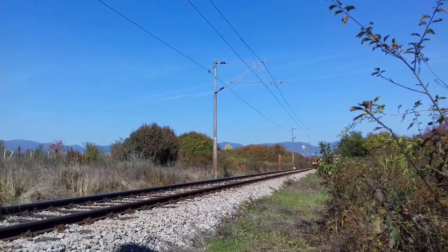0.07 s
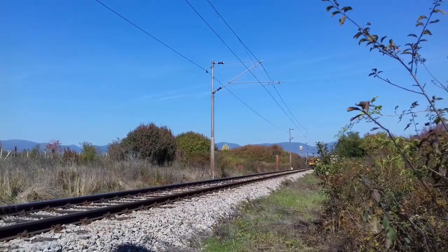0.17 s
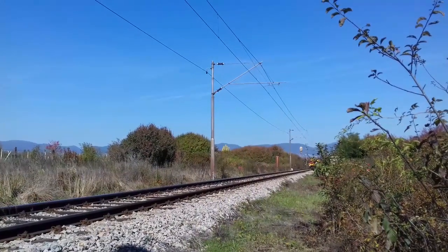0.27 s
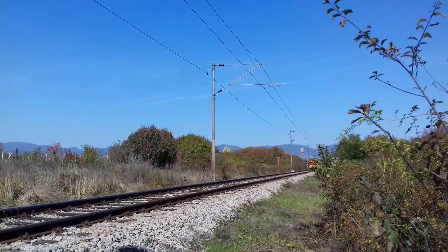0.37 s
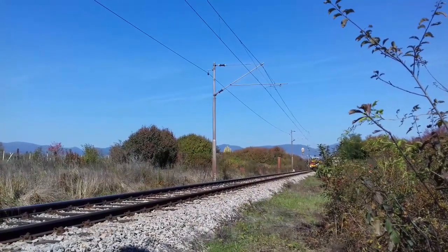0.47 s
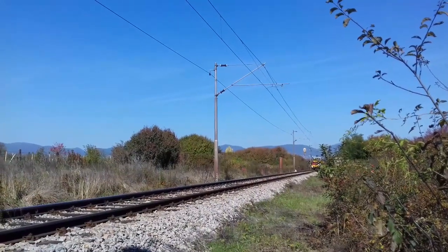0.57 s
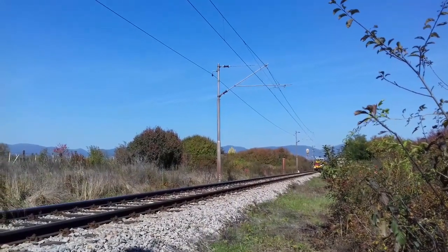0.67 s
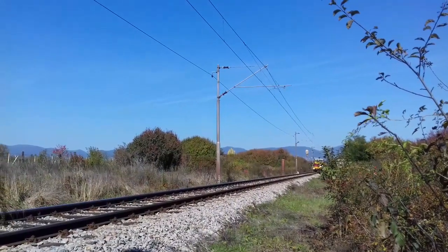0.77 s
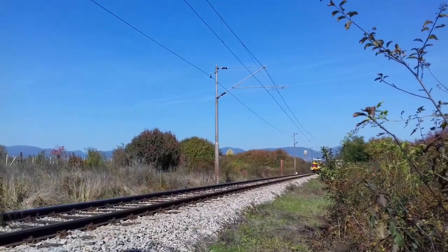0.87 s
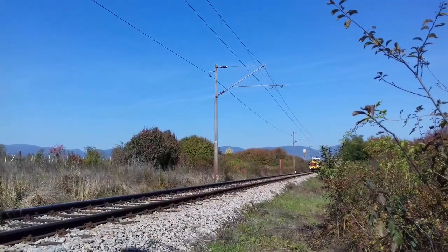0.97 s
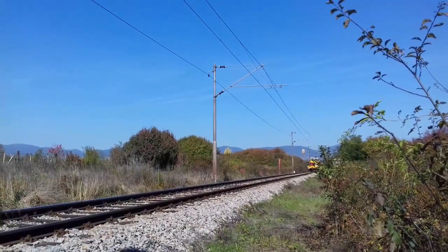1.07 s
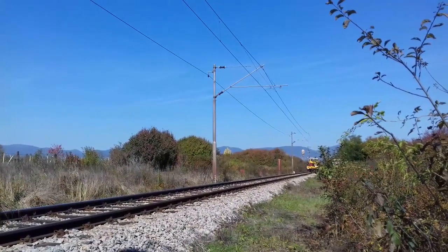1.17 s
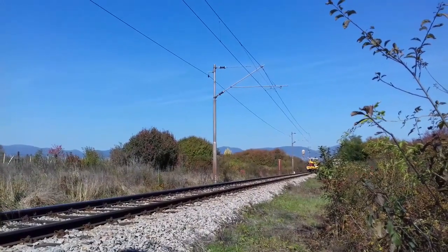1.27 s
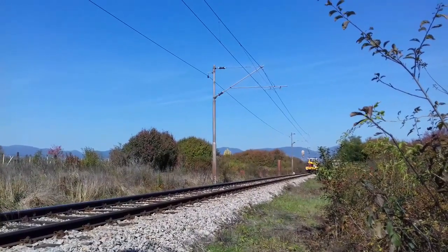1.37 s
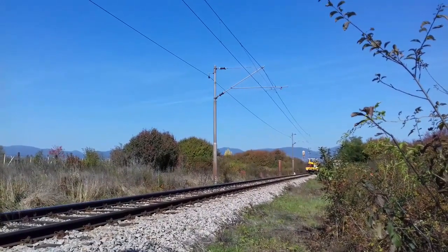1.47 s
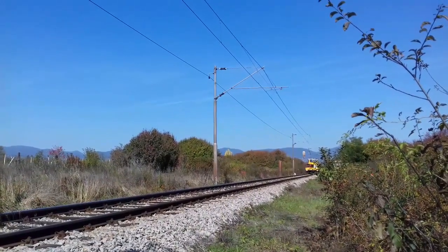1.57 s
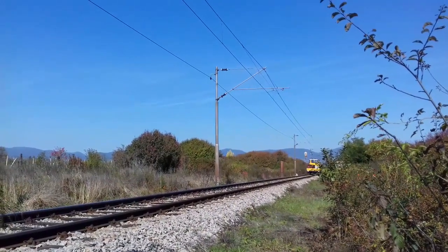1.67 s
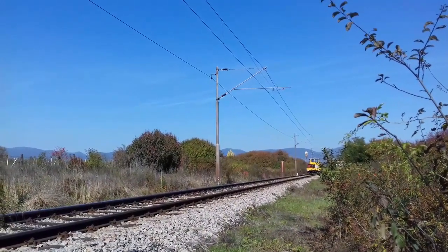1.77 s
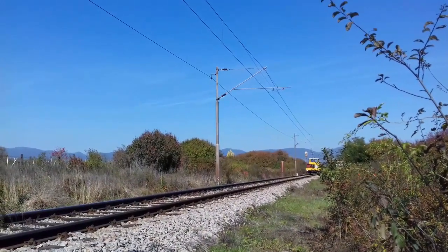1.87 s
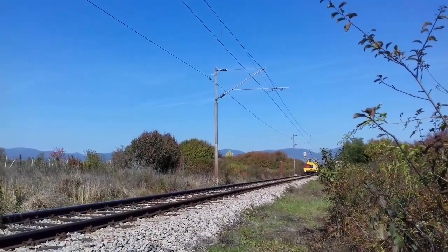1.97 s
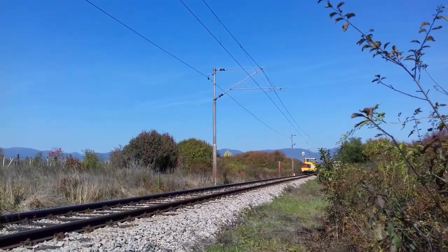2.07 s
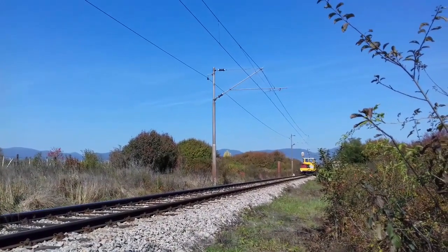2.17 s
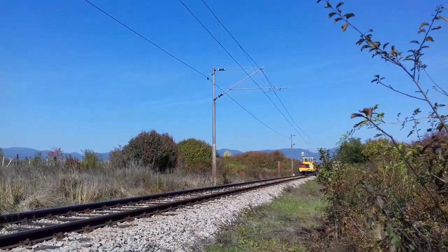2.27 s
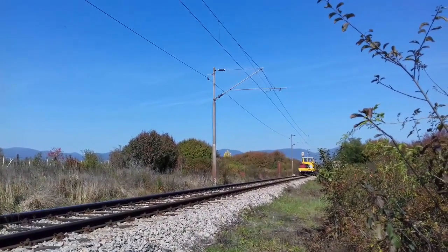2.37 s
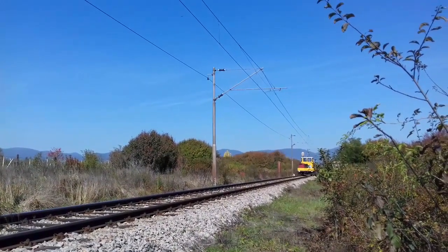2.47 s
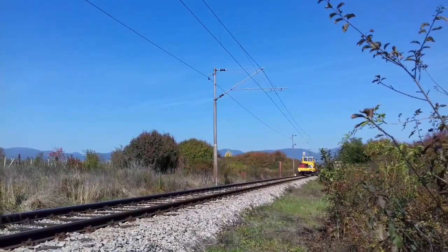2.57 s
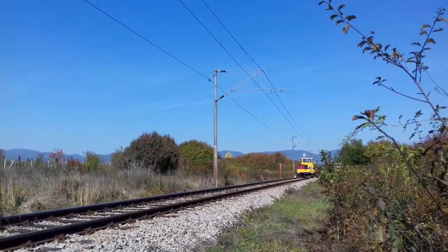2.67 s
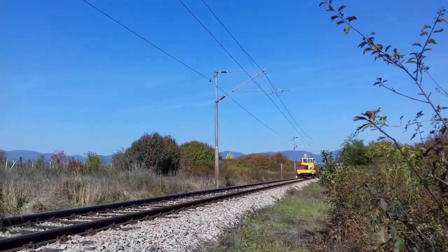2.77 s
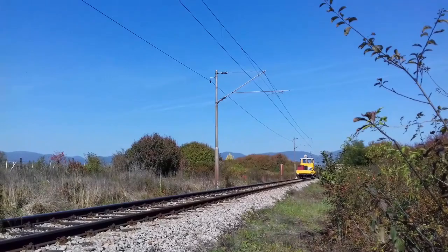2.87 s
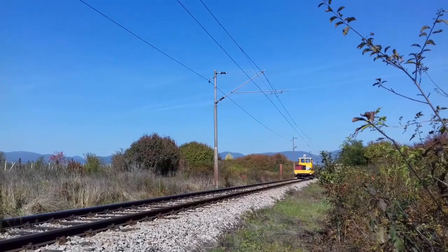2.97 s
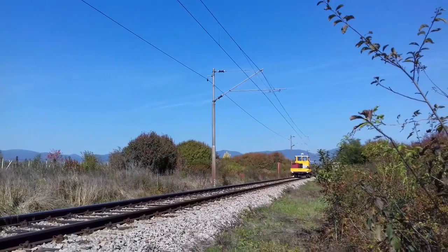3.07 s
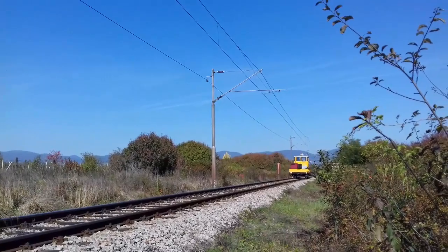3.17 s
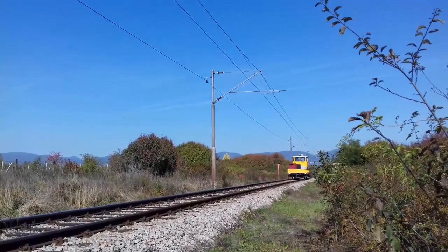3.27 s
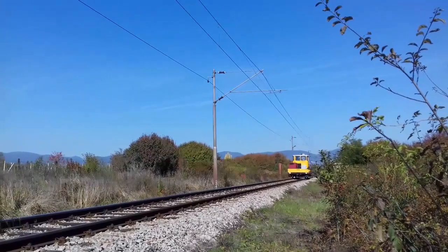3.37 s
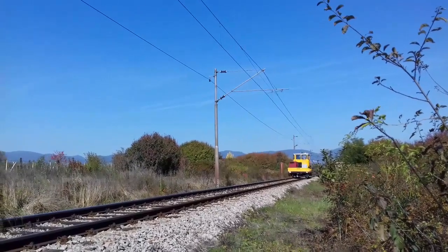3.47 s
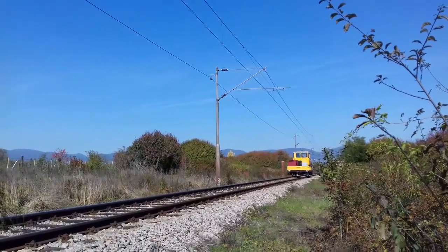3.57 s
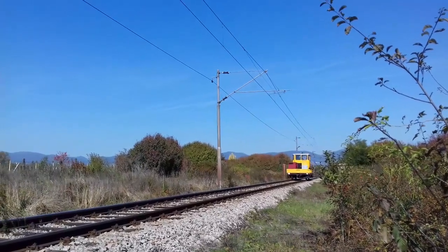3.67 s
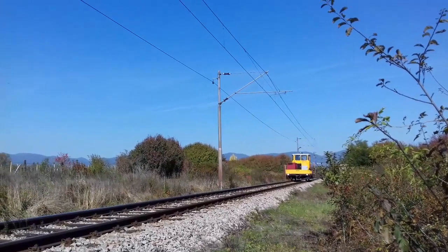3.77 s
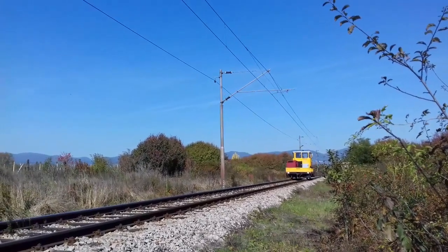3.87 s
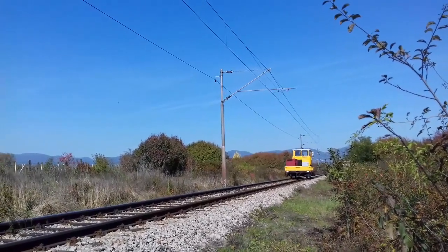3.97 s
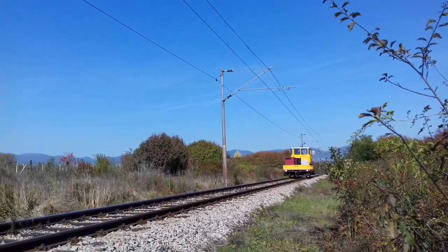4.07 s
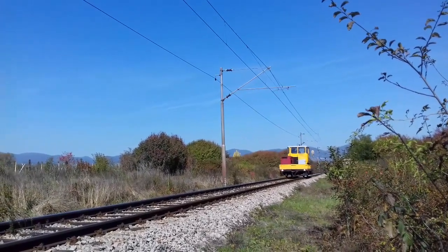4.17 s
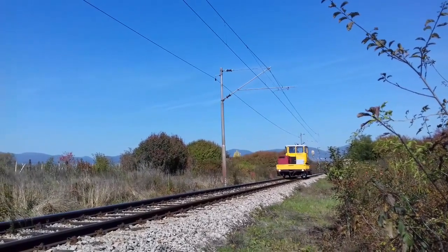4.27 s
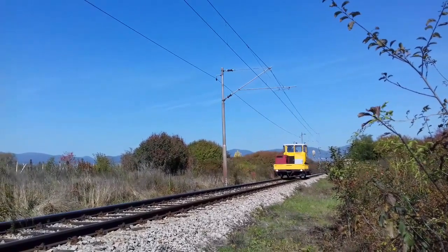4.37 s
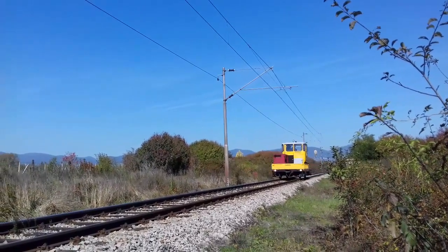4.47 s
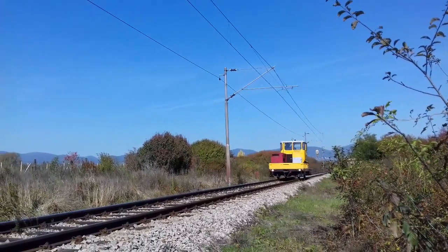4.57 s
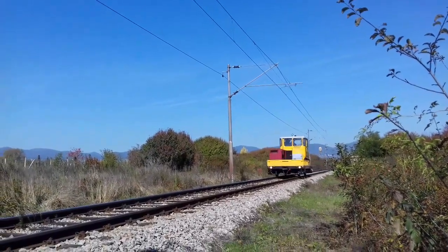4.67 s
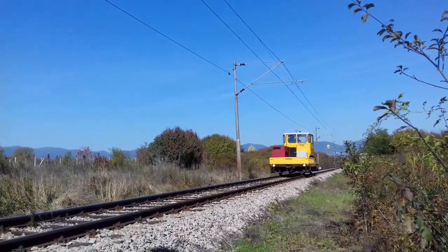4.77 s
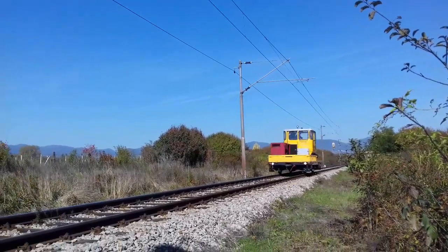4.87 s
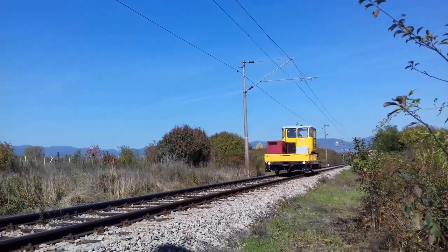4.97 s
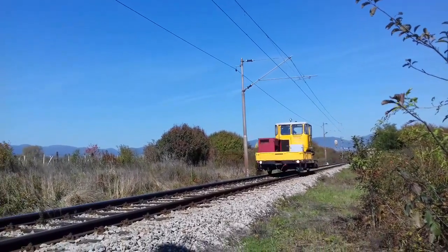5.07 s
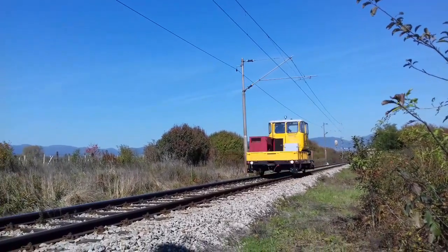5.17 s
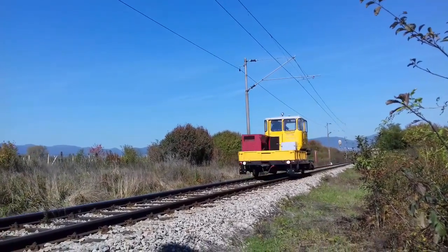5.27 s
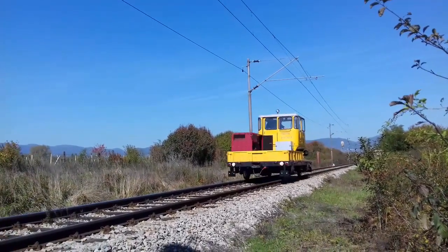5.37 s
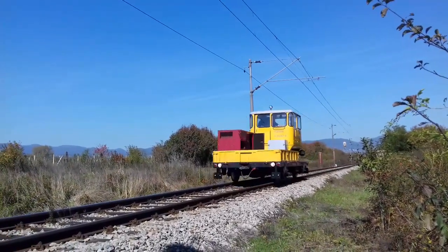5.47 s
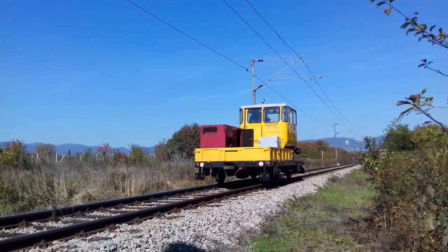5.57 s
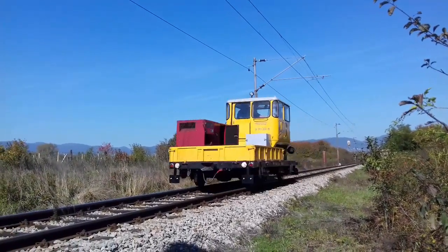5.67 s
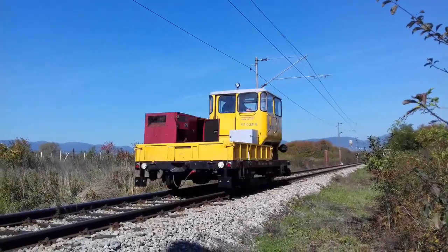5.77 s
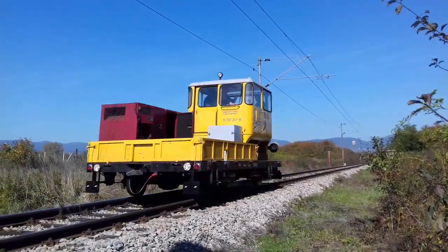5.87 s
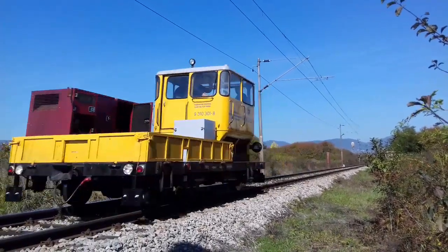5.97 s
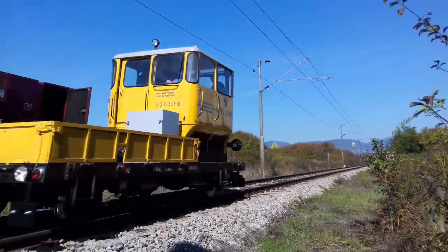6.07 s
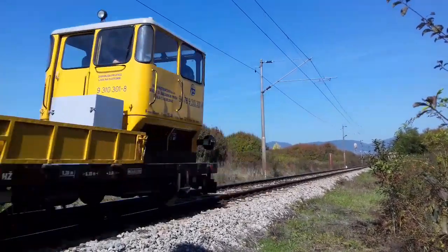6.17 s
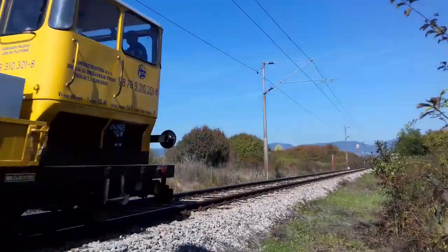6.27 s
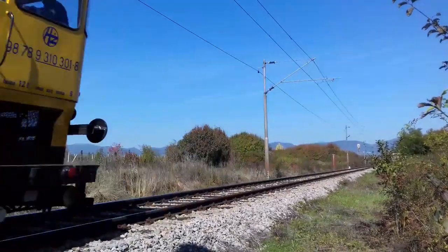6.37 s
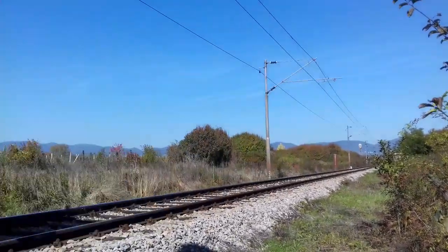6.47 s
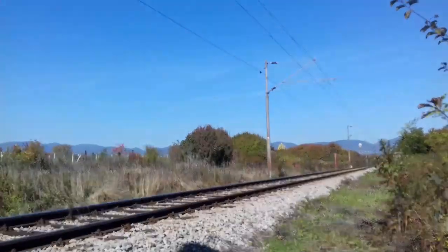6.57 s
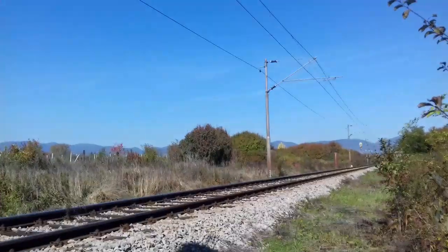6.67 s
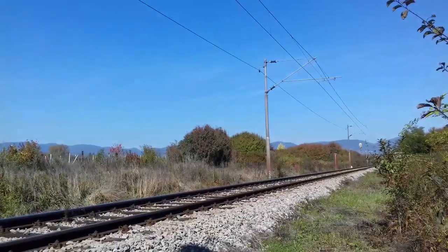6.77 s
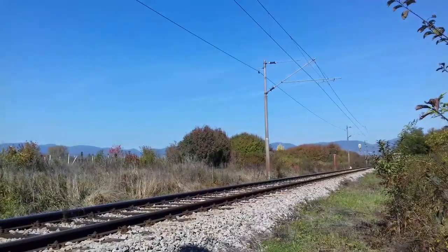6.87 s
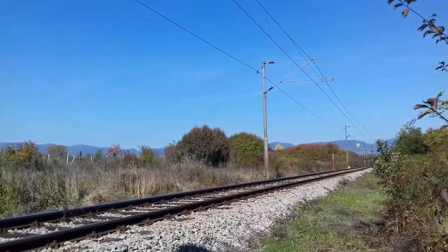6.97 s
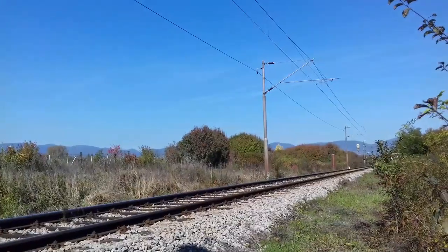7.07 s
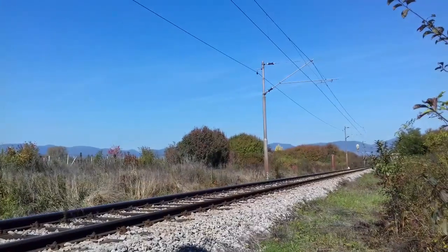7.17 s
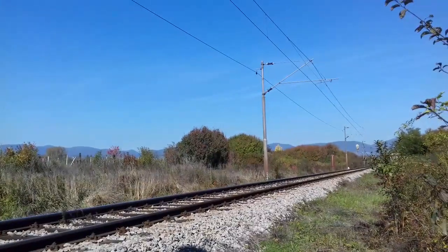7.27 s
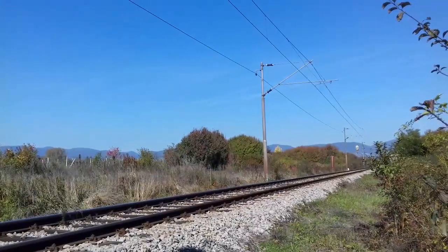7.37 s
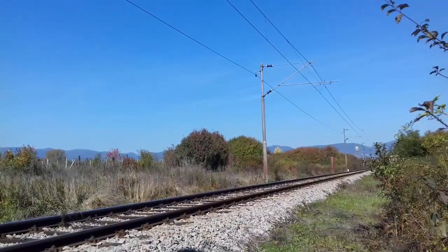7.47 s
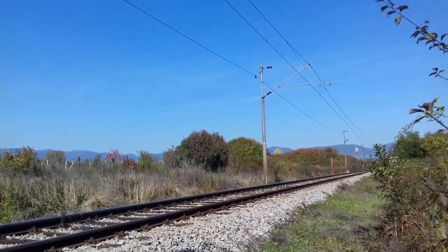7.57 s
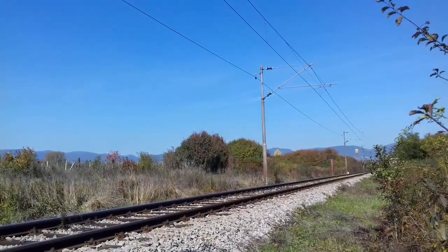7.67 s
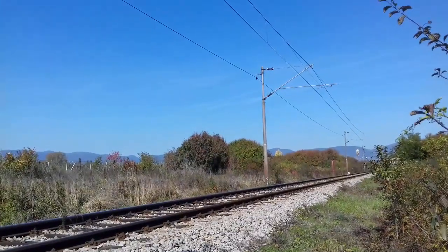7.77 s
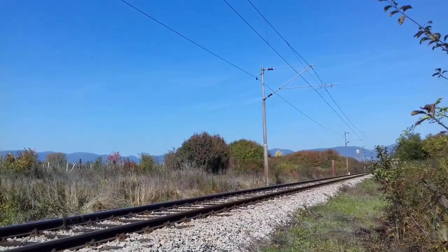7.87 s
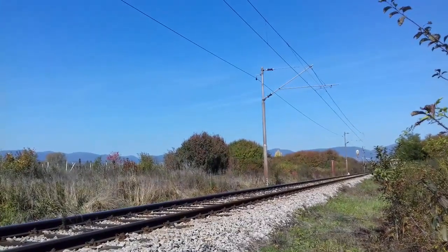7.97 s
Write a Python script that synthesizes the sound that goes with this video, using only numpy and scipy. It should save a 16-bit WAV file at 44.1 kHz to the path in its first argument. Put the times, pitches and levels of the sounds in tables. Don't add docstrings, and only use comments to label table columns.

```python
import sys
import numpy as np
from scipy import signal
from scipy.io import wavfile
from scipy.ndimage import uniform_filter1d

SR = 44100
rng = np.random.default_rng(int(sys.argv[2]) if len(sys.argv) > 2 else 0)


def volts_from_db(level):
    exponent = np.asarray(level, float) / 20
    return 10 ** exponent


def int16_out(signal):
    q = np.round(np.clip(np.atleast_2d(signal).T, -1, 1) * 32767)
    wavfile.write(sys.argv[1], SR, q.astype(np.int16))


N = 353682
TIME = np.arange(N) / SR
HOP = 256
FRAMES = np.arange(N // HOP + 5) * HOP / SR
BINS = np.fft.rfftfreq(1024, 1 / SR)[:, None]
SPEED_M_S = 17.34

# (time [s], side [0 front, 1 flank, 2 rear])
SIDE_SEEN = [
    (0, 0),
    (4.8, 0.15),
    (5.2, 0.74),
    (5.7, 0.7),
    (6.6, 0.82),
    (6.9, 1.9),
    (7.2, 2.6),
    (8.02, 2.2),
]


def evened(x):
    return x / np.sqrt(np.mean(x ** 2) + 1e-20)


def read(points, hz):
    f, value = np.transpose(points)
    return np.interp(np.log(hz + 1), np.log(f + 1), value)


def along(rows, t):
    s, *columns = np.transpose(rows)
    return [np.interp(t, s, c) for c in columns]


def bumps(rows, t):
    s, length, *columns = np.transpose(rows)
    return np.array(columns) @ np.exp(-((t - s[:, None]) / length[:, None]) ** 2)


def turned(front, flank, rear, facing):
    to_flank = np.clip(facing, 0, 1) * (flank - front)
    to_rear = np.clip(facing - 1, 0, 1) * (rear - flank)
    return front + to_flank + to_rear


def wander(rate_hz):
    poles = [np.exp(-2 * np.pi * rate_hz / SR)] * 2
    return evened(signal.lfilter([1], np.poly(poles), rng.standard_normal(N)))


def noise(field_db, patchy_db):
    real, imag, patches = rng.standard_normal(field_db.T.shape + (3,)).T
    patches = uniform_filter1d(patches, size=2, axis=0)
    patches = evened(uniform_filter1d(patches, size=24, axis=1))
    spectra = (real + 1j * imag) * volts_from_db(field_db + patchy_db * patches)
    return signal.istft(spectra, nperseg=1024, noverlap=768)[1][:N]


def countryside():
    # (frequency [Hz], density [dB per Hz])
    air_spectrum = [(20, -14), (50, -7), (75, -2), (110, 2), (200, -9), (1500, -14), (5000, -45),
                    (16000, -29)]
    air_db, drone_db, drone_hz = -59, -66, 83.5
    air = volts_from_db(air_db) * evened(noise(read(air_spectrum, BINS) + 0 * FRAMES, patchy_db=1.5))
    drone = volts_from_db(drone_db + 3.0 * wander(rate_hz=2.8)) * np.sin(2 * np.pi * drone_hz * TIME)
    return air + drone


def distance_m(t):
    abreast_s, reach_m = 6.34, 6.28
    return np.hypot(SPEED_M_S * (t - abreast_s), reach_m)


def shaft_turns():
    shaft_hz, track_m, nearest_s, sound_m_s = 42.92, 4.26, 6.52, 343
    gone_m = SPEED_M_S * (TIME - nearest_s)
    away_m_s = SPEED_M_S * gone_m / np.hypot(gone_m, track_m)
    heard_hz = shaft_hz / (1 + away_m_s / sound_m_s)
    return np.cumsum(heard_hz * (1 + 0.0012 * wander(rate_hz=3.43))) / SR


def notch(rows, hz_wide, crest):
    notch_hz, depth_db = along(rows, FRAMES)
    at_frames = np.minimum(np.arange(len(FRAMES)) * HOP, N - 1)
    depth_db = depth_db * (1 + 0.2 * wander(rate_hz=25.0)[at_frames])
    off = (BINS - notch_hz) / hz_wide
    return depth_db * (crest * np.exp(-((off - 3) / 2) ** 2) - 1 / (1 + abs(off) ** 3))


def roar_field():
    # (frequency [Hz], density [dB per Hz])
    front_spectrum = [(24, -50), (40, -32), (61, -31.5), (160, -3), (350, -9.5), (700, -7.5), (1200, -4),
                      (2000, -1.5), (3000, -7.5), (3600, -12), (4200, -14), (5000, -24), (6500, -39),
                      (8500, -40), (14000, -110)]
    flank_spectrum = [(18, -60), (30, -44), (55, -81), (135, -13), (224, -9.5), (263, -10.5), (372, -4),
                      (694, -2), (938, -3), (1360, -2.5), (1960, -10), (2710, -13), (3750, -5.5),
                      (5820, -32.5), (7500, -33.5), (9750, -40), (16500, -120)]
    rear_spectrum = [(18, -64), (30, -40), (71, -27), (109, -15.5), (204, 1), (234, -14), (269, -7),
                     (437, 3.5), (960, 0.5), (1520, -4.5), (2100, -2), (2590, -0.5), (3340, -6),
                     (4210, -7.5), (7500, -30.5), (9750, -44), (16500, -120)]
    # (frequency [Hz], gain [dB])
    mic_response = [(20, -31), (100, 3.5), (3000, 1.5), (4300, -0.5), (4700, -0.5), (5000, 0), (6000, 2),
                    (8000, -1)]
    # (time [s], length [s], boom [dB])
    exhaust = [
        (5.12, 0.25, -7),
        (5.8, 0.65, -6),
        (6.45, 0.18, 10.5),
        (6.85, 0.18, 10.5),
    ]
    # (frequency [Hz], width [Hz], front [dB], flank [dB], rear [dB])
    rings = [(480, 38, -3, -1.5, 0.46), (685, 130, 7, 0.5, 0), (942, 65, -3.5, -3, 0.52),
             (1140, 114, 3, -2, 0.24), (1550, 300, -3.5, 0.5, 0), (2010, 350, 2, 1.5, 0),
             (2595, 81, -5, 2, 0), (2910, 110, -1, -1.5, 0), (3580, 210, 0.5, 0.5, 0.09),
             (4220, 56, 1.5, 3.5, 0.096), (4250, 50, -4, 4, 0), (4580, 150, 1.5, 4, 0.79),
             (5130, 340, -3, 2, 0)]
    # (time [s], length [s], frequency [Hz], width [Hz], level [dB])
    flashes = [(.6, 1, 2300, 220, 3.5), (1.8, 0.26, 730, 110, -8.5), (4.2, .6, 1890, 140, 4.5),
               (4.185, .036, 1510, 150, 9), (4.88, 0.18, 5700, 1190, 8), (5.095, 0.063, 3930, 890, 6),
               (5.4, 0.27, 2880, 190, 6), (5.688, .08, 3430, 500, 4), (5.82, .1, 4350, 600, 3),
               (6.2, .3, 4100, 450, 3), (5.247, 0.23, 150, 90, 4), (5.452, 0.21, 4300, 500, -4.5),
               (5.9, 0.43, 70, 45, -14), (5.816, 0.078, 172, 70, 8.5), (5.95, .33, 660, 150, 4.5),
               (6.085, 0.026, 1900, 150, 8), (6.379, 0.055, 1480, 300, 4), (6.45, .22, 130, 70, -7),
               (7.114, 0.022, 560, 150, 7), (6.726, 0.33, 720, 120, -4.5), (6.85, 0.25, 5060, 905, -5.5),
               (6.88, .17, 380, 90, 6), (7.4, 0.29, 5540, 2500, 4)]
    # (time [s], notch [Hz], depth [dB])
    shoulder = [(0, 3580, 3), (4.92, 3350, 4), (5.03, 2850, 10), (5.1, 2230, 7), (5.25, 1560, 9),
                (5.58, 1470, 9), (5.76, 1700, 4.5), (6.55, 1550, 1), (6.95, 950, 5), (8.02, 1770, 4.5)]
    # (time [s], notch [Hz], depth [dB])
    ground = [(0, 2230, 5), (5.1, 2270, 0.5), (5.55, 1930, 4.5), (5.8, 2490, 12), (6, 2620, 11),
              (6.25, 2530, 5.5), (6.7, 2800, 0), (7.1, 3600, 0.5), (8.02, 3570, -0.5)]

    facing = along(SIDE_SEEN, FRAMES)[0]
    sides = [read(spectrum, BINS) for spectrum in (front_spectrum, flank_spectrum, rear_spectrum)]
    field = turned(*sides, facing) + read(mic_response, BINS)

    bass_far_db, bass_near_db, bass_reach_m = -8.5, 3.5, 65
    nearness = 1 / (1 + (distance_m(FRAMES) / bass_reach_m) ** 4)
    bass_db = bass_far_db + (bass_near_db - bass_far_db) * nearness
    field = field + bass_db / (1 + (BINS / 400) ** 2)
    field = field + bumps(exhaust, FRAMES)[0] * np.exp(-((BINS - 280) / 70) ** 2)

    for hz, width_hz, *side_db in rings:
        field = field + turned(*side_db, facing) * np.exp(-((BINS - hz) / width_hz) ** 2)
    for s, length_s, hz, width_hz, db in flashes:
        field = field + db * np.exp(-((BINS - hz) / width_hz) ** 2 - ((FRAMES - s) / length_s) ** 2)
    field = field + notch(shoulder, hz_wide=219, crest=0.059) + notch(ground, hz_wide=278, crest=0.19)
    return field - 10 * np.log10(np.mean(volts_from_db(2 * field), axis=0))


def roar(turns):
    # (time [s], level over the roar [dB], t60 [s])
    knocks = [
        (4.17, -1, 0.052),
        (4.86, -18, 0.072),
        (5.28, -12, 0.055),
        (6.384, 0, 0.13),
        (6.545, 2.5, 0.097),
        (7.11, 3, 0.046),
    ]
    sound = evened(noise(roar_field(), patchy_db=1.8))
    highpass = signal.butter(2, 500, "high", fs=SR, output="sos")
    clatter = signal.sosfilt(highpass, sound)
    throb = 0.041 * np.cos(2 * np.pi * turns) + 0.021 * np.cos(4 * np.pi * turns)
    throb = throb + 0.056 * wander(rate_hz=23.0)
    jolts = np.zeros(N)
    for s, db, t60_s in knocks:
        decay = volts_from_db(-60 * np.maximum(TIME - s, 0) / t60_s)
        jolts += volts_from_db(db) * decay * (TIME > s) / 2
    return sound + clatter * (throb + jolts)


def hum(turns):
    # (multiple of shaft speed, front [dB], flank [dB], rear [dB])
    strong = [(6, -23, -10, -19), (7, -28, -26, -28), (8, -17.5, -42, -27)]
    # (multiple of shaft speed, front [dB], flank [dB], rear [dB])
    weak = [(1.5, -28, -44, -44), (2, -34, -30, -26), (3, -28, -36, -36), (4, -27, -26, -30),
            (9, -35, -31, -23), (10, -29, -24, -29)]
    # (time [s], length [s], order 6 [dB], order 7 [dB], order 8 [dB])
    in_step = [
        (1.8, 0.69, 5, 0, 2),
        (3.3, 0.65, 7.5, -9, 3),
        (4.6, 0.22, 0, -4, 3),
        (5.55, 0.13, 4.5, -3, 0),
        (6.14, .1, -2, 19, 8),
        (6.25, .08, -14, 0, 0),
        (6.72, .15, -6, -8, 20),
        (7.55, 0.46, 7, 0, -4),
    ]
    facing = along(SIDE_SEEN, TIME)[0]
    orders = [(k, turned(*side_db, facing) + swell_db)
              for (k, *side_db), swell_db in zip(strong, bumps(in_step, TIME))]
    orders += [(k, turned(*side_db, facing)) for k, *side_db in weak]
    waver_db, smear_turns = 2.2, 0.11
    total = np.zeros(N)
    for k, db in orders:
        level = volts_from_db(db + waver_db * wander(rate_hz=5.9)) * np.sqrt(2)
        phase_turns = k * turns + rng.random() + smear_turns * wander(rate_hz=10.3)
        total += level * np.sin(2 * np.pi * phase_turns)
    return total


def loudness():
    # (time [s], length [s], level [dB])
    level_swells = [(.22, 0.15, 1.5), (2.9, 0.51, -1.5), (3.5, 0.033, 0), (4.6, .6, 0.5), (5.2, 0.051, -0.5),
                    (5.72, 0.26, 2.5), (6.05, 0.023, 0.5), (6.27, 0.034, -1.5), (6.72, 0.14, 1), (7.0, 0.16, 2.5),
                    (7.27, 0.11, 1.5), (8.02, 0.071, 3.5)]
    loudest_db, reach_m, grass_db_per_m = -12, 6.28, 0.1438
    bank_s, bank_edge_s, bank_db = 7.16, 0.02, -3.5
    clear_s, clear_edge_s = 7.74, 0.25
    far_m = distance_m(TIME)
    spread_db = -20 * np.log10(far_m / reach_m) - grass_db_per_m * (far_m - reach_m)
    hidden = (np.tanh((TIME - bank_s) / bank_edge_s) - np.tanh((TIME - clear_s) / clear_edge_s)) / 2
    return volts_from_db(loudest_db + spread_db + bank_db * hidden + bumps(level_swells, TIME)[0])


def scene():
    turns = shaft_turns()
    trolley = loudness() * (roar(turns) + hum(turns))
    return (trolley + countryside())[None]


def low_pass(x):
    return signal.sosfilt(signal.butter(12, 15800, fs=SR, output="sos"), x)


def record(dry):
    fine = signal.resample_poly(dry, 160, 147, axis=1)
    nearest = np.minimum(np.arange(N) * 160 // 147, fine.shape[1] - 1)
    limited = 1.397 * np.tanh(fine[:, nearest] / 1.3)
    return low_pass(limited)


dry = scene()
out = record(dry)
int16_out(out)
```